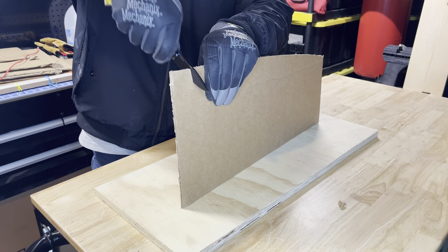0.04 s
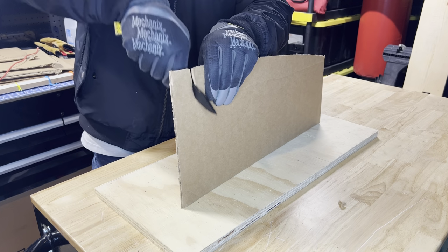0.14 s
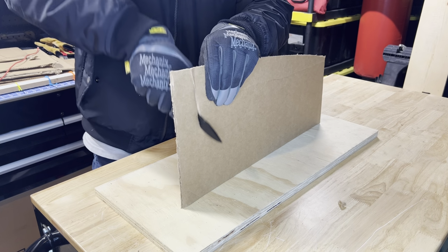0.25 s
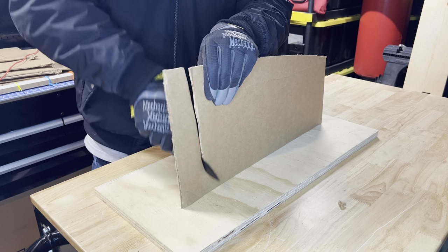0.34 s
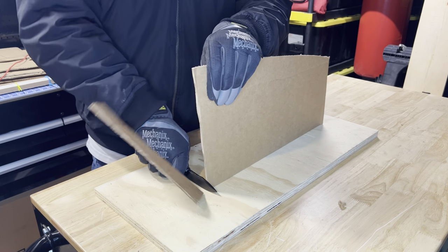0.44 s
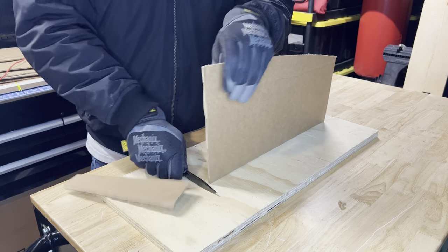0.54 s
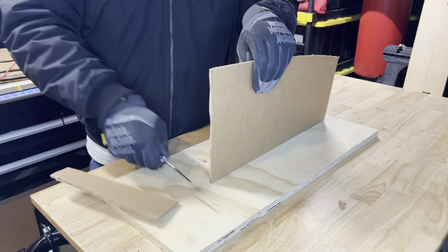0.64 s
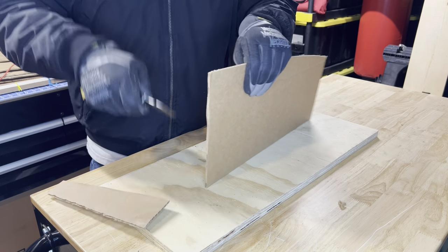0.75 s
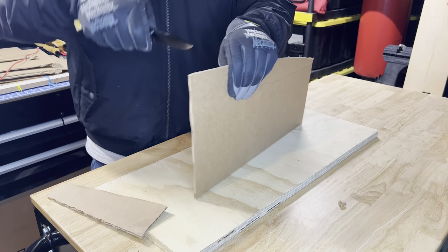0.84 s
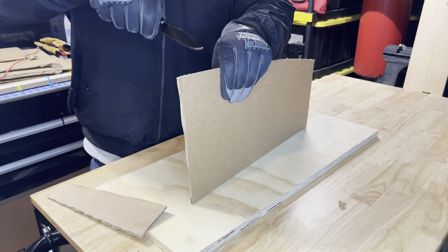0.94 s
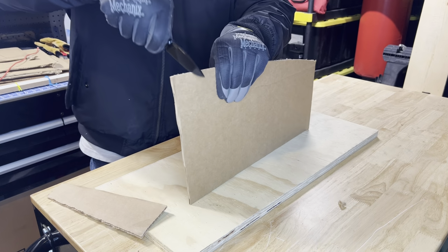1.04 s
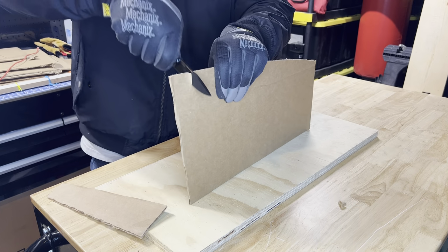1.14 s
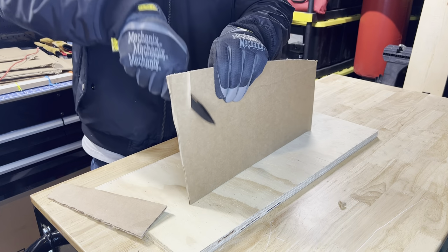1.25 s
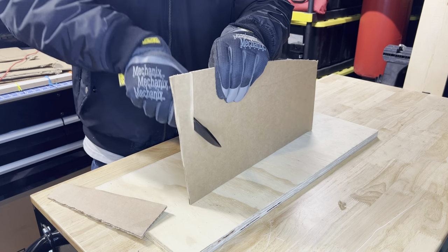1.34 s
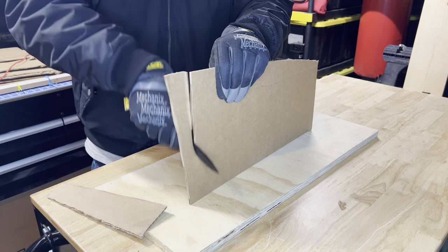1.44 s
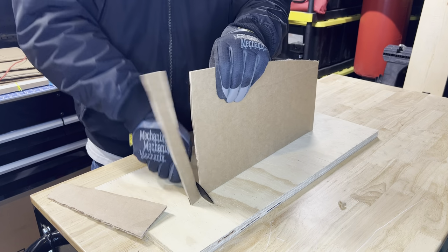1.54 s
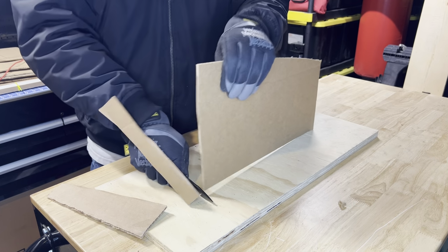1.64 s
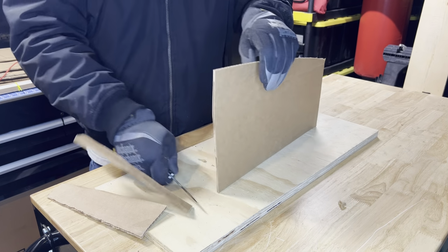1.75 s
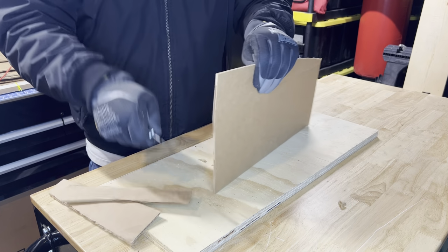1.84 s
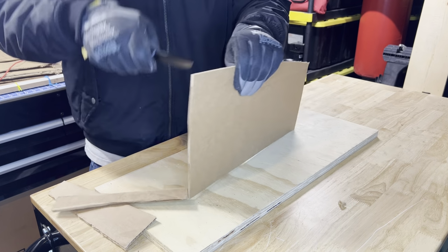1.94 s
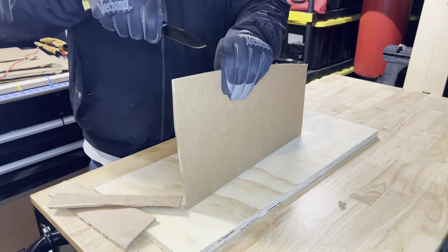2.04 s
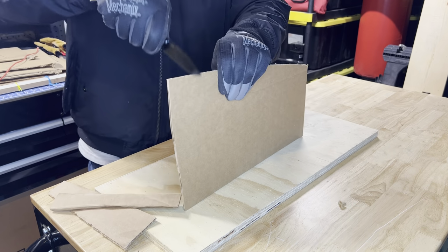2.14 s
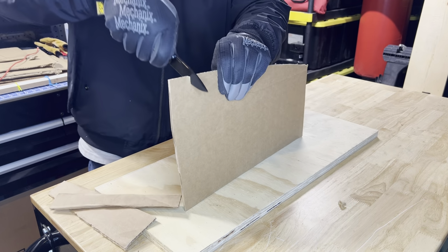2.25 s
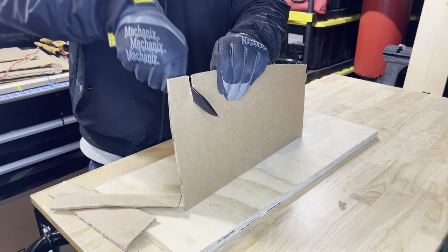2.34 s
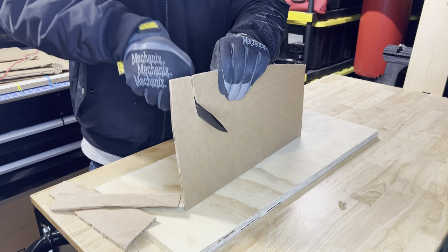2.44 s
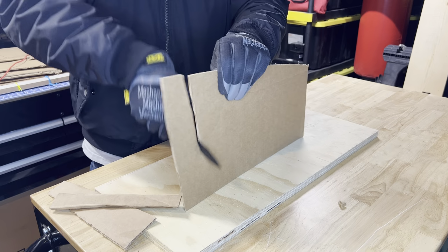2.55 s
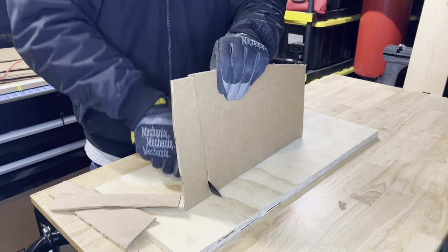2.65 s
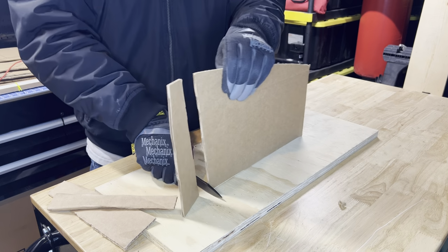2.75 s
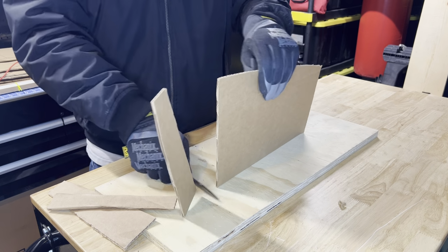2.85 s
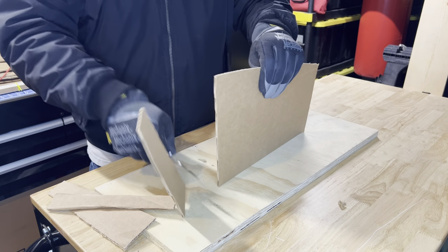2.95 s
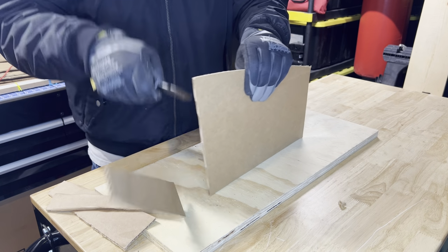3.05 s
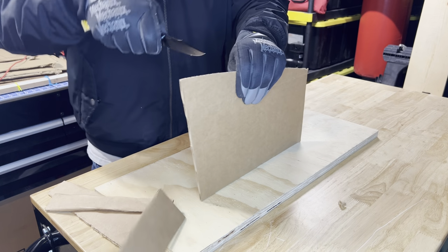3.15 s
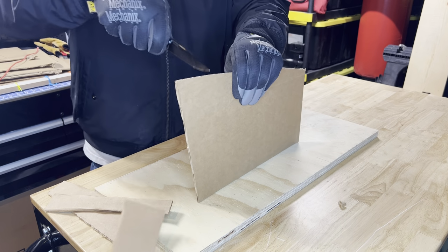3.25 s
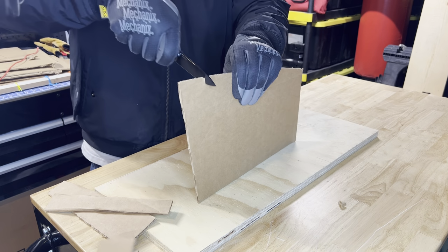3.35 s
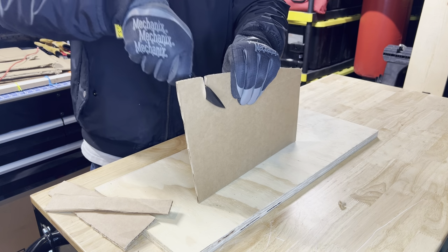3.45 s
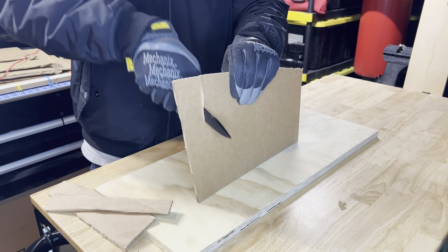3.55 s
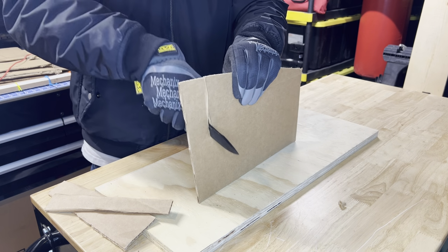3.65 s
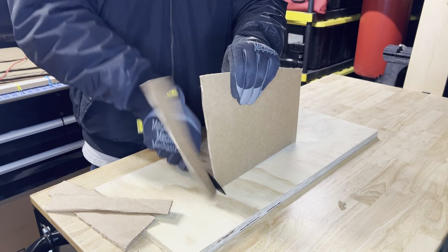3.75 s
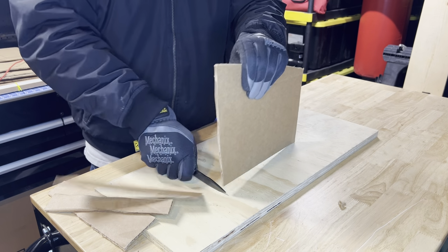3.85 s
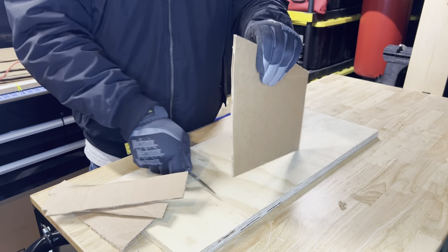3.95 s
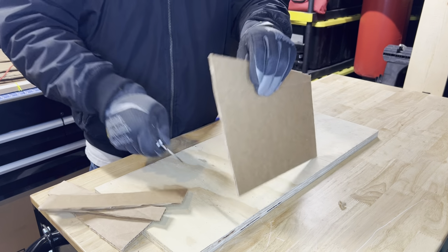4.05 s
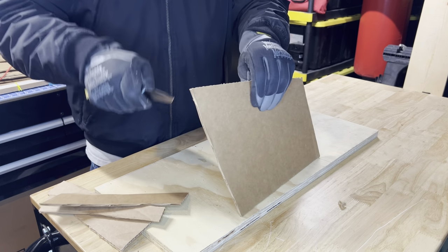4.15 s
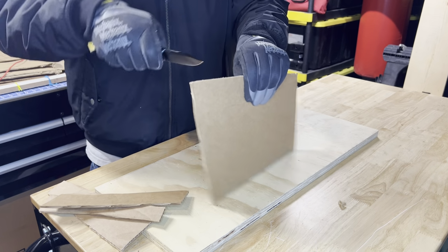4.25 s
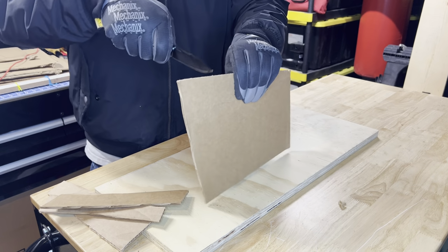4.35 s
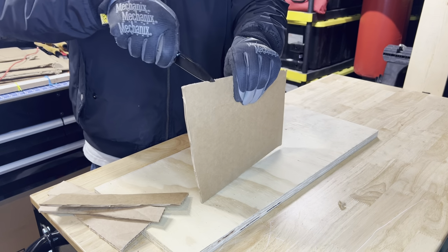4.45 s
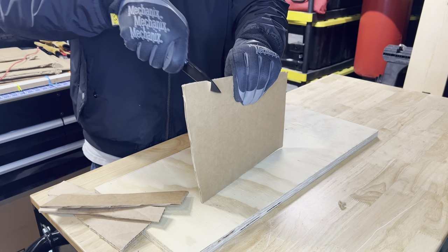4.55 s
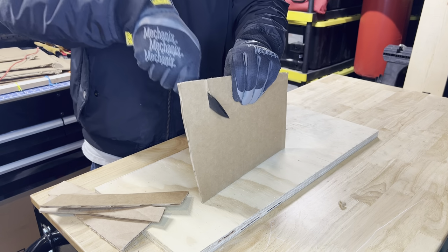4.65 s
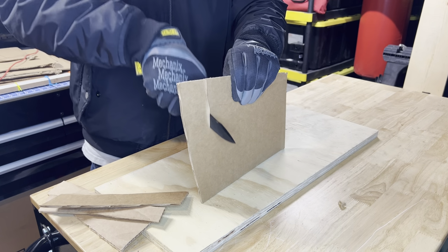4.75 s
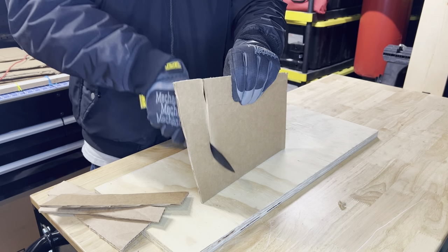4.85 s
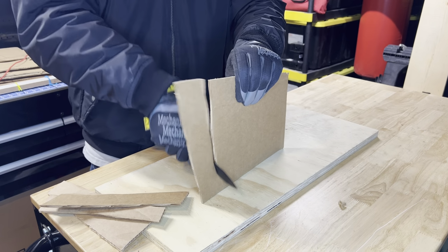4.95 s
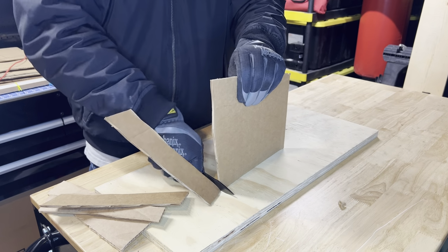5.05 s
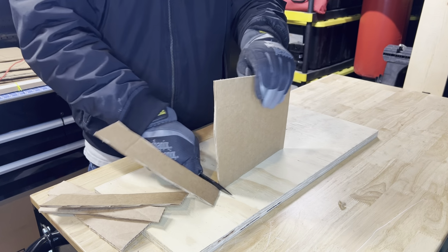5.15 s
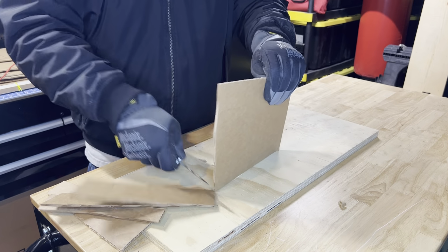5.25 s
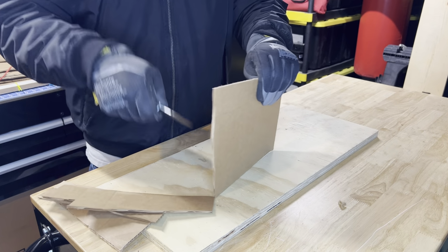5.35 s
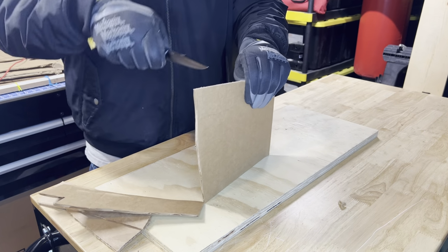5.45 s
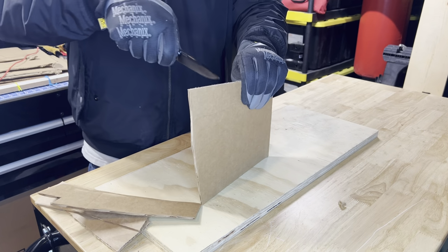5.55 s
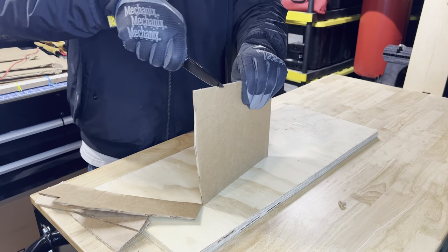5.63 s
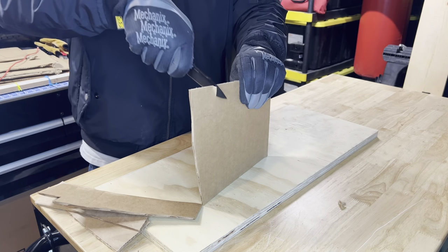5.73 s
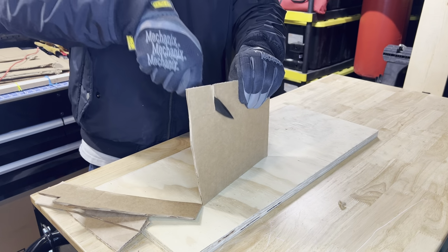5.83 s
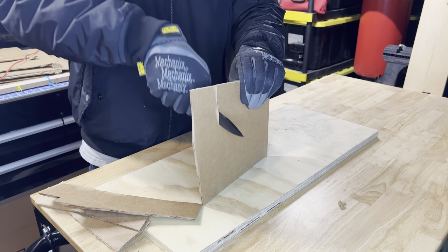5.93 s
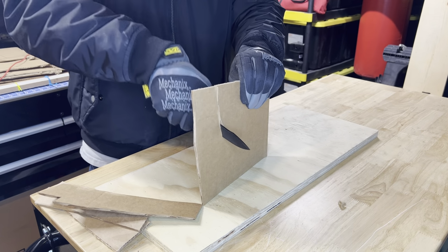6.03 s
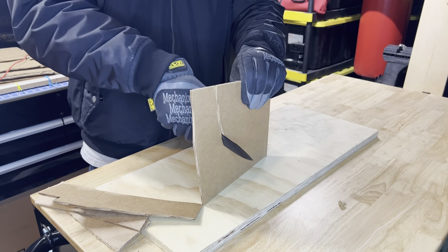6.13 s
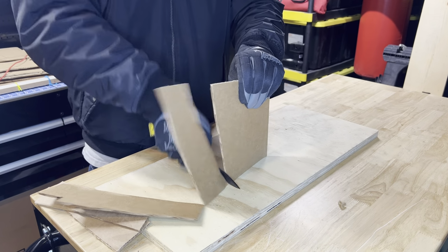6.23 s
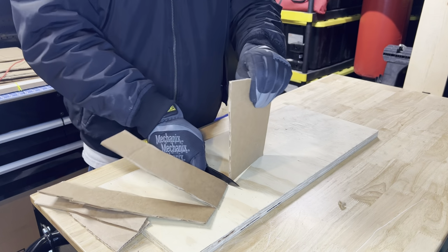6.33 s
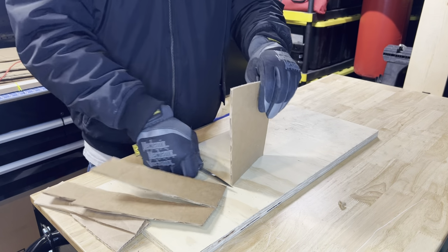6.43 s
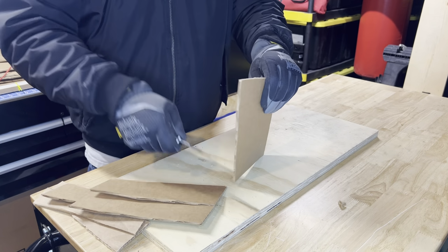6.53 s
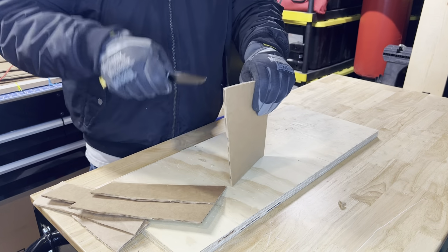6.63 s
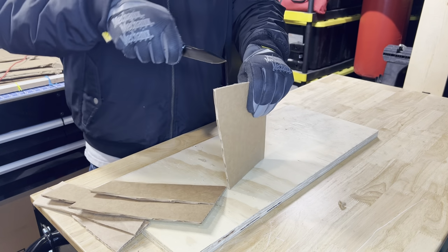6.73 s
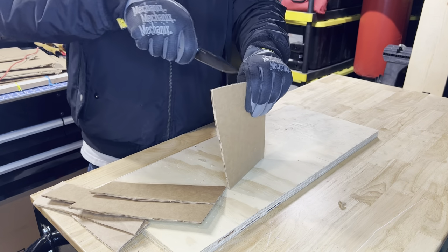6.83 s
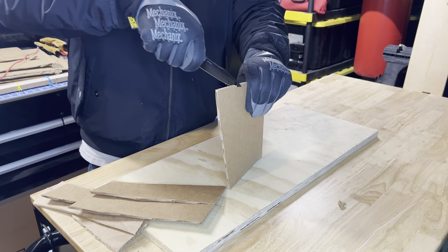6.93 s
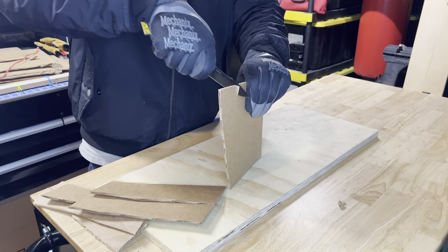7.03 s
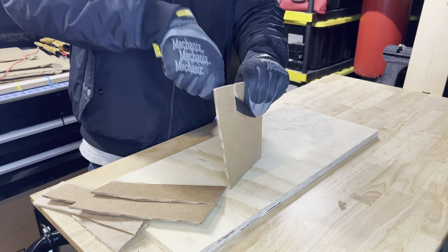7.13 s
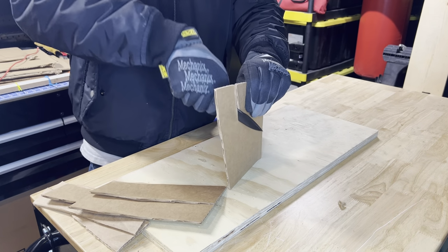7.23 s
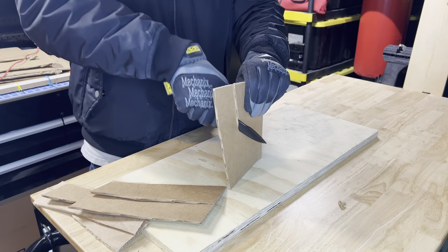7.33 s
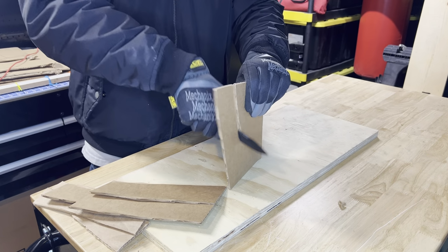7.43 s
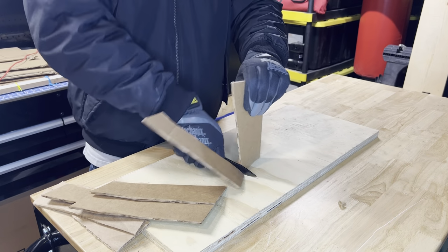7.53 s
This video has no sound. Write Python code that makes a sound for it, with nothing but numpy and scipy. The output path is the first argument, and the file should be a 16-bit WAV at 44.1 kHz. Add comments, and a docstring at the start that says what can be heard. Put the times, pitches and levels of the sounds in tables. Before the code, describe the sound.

Close, crisp cardboard slicing: seven fibrous ripping strokes with end knocks, hollow strip drops, sleeve rustle and sheet bumps on a wooden bench.

```python
"""Cutting cardboard in a small garage

A folding knife slices seven strips off a corrugated sheet held upright on a wooden bench, near a stereo pair.
Most strokes open with a tap on the top edge; all rasp down through snapping fibres and end in a knock.
Cut strips drop and ring; between strokes a sleeve rustles and the sheet is bumped or dragged over the wood.
Clicks and noise make the rasp and rustle, dying modes the rings; the garage adds echoes and a short tail."""
import sys
import numpy as np
from scipy import signal
from scipy.fft import rfft, irfft
from scipy.io import wavfile

SR = 44100
rng = np.random.default_rng(int(sys.argv[2]) if len(sys.argv) > 2 else 0)


def generate_wav(signal):
    """Clip the signal to [-1, 1] and save it as 16-bit WAV at the path in sys.argv[1]."""
    frames = np.transpose(np.atleast_2d(signal))
    scaled = np.clip(frames, -1, 1) * 32767
    pcm = np.round(scaled).astype(np.int16)
    wavfile.write(sys.argv[1], SR, pcm)


N = 334391
TIME = np.arange(N) / SR  # [s], one value per sample
CLOCK = np.arange(0, N / SR + .001, .001)  # [s], coarser steps for slow gestures

# Levels in the tables are relative: each layer also has a gain of its own.
# the blade's steady travel down the sheet: (start [s], end [s], rasp of the fibres [dB],
#   drone of the flutes [dB], shudder of the sheet [dB], hollow note [Hz] before drift and fall)
STROKES = [(-.02, 0.41, -37.5, -43, -41.5, 1430), (1.053, 1.584, -39.5, -41.5, -38.5, 1526),
           (2.169, 2.7, -45.5, -42.5, -40.5, 1510), (3.337, 3.746, -40, -40.5, -36.5, 1458),
           (4.488, 5.016, -41.5, -50, -43, 1539), (5.615, 6.284, -43.5, -43, -40.5, 1595),
           (6.908, 7.537, -43.5, -53, -47.5, 1790)]
# the hand pushes harder and the blade surges ahead:
#   (peak [s], rise [s], fall [s], rasp [dB], drone [dB], shudder [dB])
SURGES = [(.165, 0.072, 0.094, -35, -40, -54), (0.306, 0.066, 0.068, -29.5, -56, -33),
          (0.382, 0.044, 0.011, -28.5, -31.5, -49), (1.29, 0.14, 0.033, -36.5, -34, -38),
          (1.438, 0.04, 0.021, -31.5, -36, -36), (1.532, 0.078, 0.011, -28, -54, -33),
          (2.309, 0.095, 0.2, -36.5, -37.5, -51), (2.566, 0.062, 0.071, -26.5, -27.5, -32),
          (3.363, 0.061, 0.075, -37, -55, -50), (3.55, 0.13, 0.028, -39.5, -31.5, -52),
          (3.711, 0.042, 0.039, -27.5, -33.5, -30), (3.753, 0.036, 0.0084, -25.5, -46, -34),
          (4.54, 0.065, 0.22, -35, -62, -51), (4.72, 0.12, 0.05, -58, -34.5, -50),
          (4.857, 0.11, 0.024, -32, -33.5, -33.5), (4.978, 0.042, 0.023, -26.5, -52, -35),
          (5.721, 0.035, 0.036, -31.5, -36, -46.5), (5.845, 0.087, 0.05, -36.5, -36, -52),
          (5.984, 0.057, 0.0099, -36.5, -37, -30), (6.231, 0.061, 0.027, -25, -27.5, -27),
          (7.012, 0.043, 0.05, -34.5, -56, -42), (7.09, 0.072, 0.048, -37, -41.5, -40),
          (7.24, 0.075, 0.054, -41, -38.5, -38), (7.352, 0.056, 0.086, -45.5, -39, -32.5),
          (7.498, 0.051, 0.0064, -23.5, -29, -30.5)]
ENTRY_S, RELEASE_S = 0.0089, 0.034  # the edge sinks in; the rasp dies away once it is out
# arm movements between strokes:
#   (peak [s], half length [s], swish of the sleeve [dB], rumble of the handled sheet [dB])
ARM_MOVES = [(0.463, 0.058, -39.5, -47), (0.576, 0.068, -50.5, -43), (0.724, 0.011, -38.5, -45),
             (.82, 0.14, -46, -45.5), (0.904, 0.033, -44, -56), (1.608, 0.11, -43.5, -47),
             (1.795, 0.073, -49.5, -39), (1.986, 0.12, -47, -47), (2.086, 0.015, -44.5, -41),
             (2.735, 0.063, -39, -39), (2.898, 0.039, -44, -58), (2.988, 0.032, -40, -43.5),
             (3.065, 0.045, -37.5, -61), (3.199, 0.035, -43, -38), (3.856, 0.12, -42, -37),
             (3.965, 0.046, -46, -46), (4.123, 0.053, -51, -32.5), (4.287, 0.036, -59, -41),
             (4.422, .03, -62, -39.5), (5.05, 0.055, -44.5, -42.5), (5.202, 0.039, -44.5, -53),
             (5.214, 0.0045, -38.5, -58), (5.336, 0.067, -44.5, -49), (5.447, 0.04, -41.5, -52),
             (6.309, 0.073, -45, -46.5), (6.422, 0.041, -50, -53), (6.676, 0.035, -46, -46.5)]
FIDGET_DB, FIDGET_RUMBLE_DB = -55, -54.5  # the jacket and the held sheet stir faintly throughout
# the faint stirring of hands and sheet dips around the start of a stroke:
#   (time [s], half length [s], dip [dB])
STIRRING_DIPS = [(1.025, .05, -1.5), (2.148, 0.032, -8), (3.26, .03, -1), (5.57, 0.041, -6),
                 (6.958, 0.4, -17)]
# the blade meets the top edge, catches on a flute or breaks out at the bottom:
#   (time [s], knock [dB], thump [dB], crisp tick [dB], hollow ring [dB], hardness [dB per octave])
CONTACTS = [(.401, -6, -27, -26, -46, -1), (1.061, -31, -40, -44, -35, -2),
            (1.283, -21, -43, -55, -24, 2.5), (1.55, -9.5, -32, -30.5, -45, -2.5),
            (2.17, -29.5, -29.5, -41.5, -38, 1), (2.697, -6.5, -28.5, -22, -44, 0.5),
            (3.283, -22.5, -31, -41.5, -33, -2.5), (3.317, -19.5, -31, -33.5, -30, -0.5),
            (3.758, -13.5, -30.5, -30.5, -43, -6.5), (4.38, -44, -39, -44.5, -53, 4),
            (4.893, -17, -28, -32.5, -27, 5), (4.991, -14.5, -31.5, -30, -31, -4),
            (5.589, -28.5, -36.5, -44, -37, -5.5), (6.069, -20.5, -39, -33, -34, -1),
            (6.244, -8, -31.5, -27.5, -31, -5), (6.8935, -38.5, -41.5, -46, -60, 2.5),
            (6.919, -42, -64, -42, -57, 6), (7.507, -9.5, -25.5, -24.5, -22.5, -4.5)]
# cut strips and the sheet's foot land on the wood: (time [s], knock [dB], crisp tick [dB],
#   hollow ring [dB], hardness [dB per octave], ring of a loose strip [dB], its note [Hz])
LANDINGS = [(.548, -20, -37.5, -32, -12.5, -53, 1500), (.567, -24.5, -45, -53, 11.5, -47, 1500),
            (1.7174, -6.5, -50, -36, 0, -11, 1580), (1.7285, -28, -61, -38, 4, -37, 1620),
            (1.765, -13, -57, -46, -4, -39, 1620), (1.834, -22, -37, -45, 9.5, -45, 1600),
            (2.8119, -17, -64, -52, -2, -19.5, 1570), (2.8471, -19, -46, -51, -4, -43, 1590),
            (3.828, -27, -42, -27, -6, -50, 1400), (3.881, -22.5, -36.5, -35, -4, -50, 1400),
            (4.1084, -1.5, -41, -22.5, 1, -22.5, 1860), (4.437, -29.5, -45, -26, 0, -31, 1646),
            (5.289, -23, -44.5, -39, -0.5, -34.5, 1460), (5.311, -22.5, -58, -44, -6.5, -41, 1450),
            (6.434, -22.5, -56, -35, -1.5, -34, 1410), (6.499, -35.5, -46, -39, 7.5, -52, 1420),
            (6.627, -29.5, -56, -41, -3, -50, 1400), (6.663, -38, -58, -44, -6, -60, 1400)]
LANDING_THUMP_DB, THUMP_GROWTH = -27, 0.61  # thump under a 0 dB landing, and dB of thump per dB of knock
# the sheet nudged softly against the bench:
#   (time [s], thump [dB], knock relative to it [dB], hardness [dB per octave])
BUMPS = [(0.67, -48.5, 8, 11), (0.731, -36, 0, 0.5), (.799, -37, 1, 5), (.885, -32.5, -12.5, 2),
         (0.913, -42.5, 1, 2), (1.393, -32.5, 5, 6), (1.928, -44, 1, 2), (2.057, -41.5, -3, 2),
         (2.547, -36, 13, -10), (2.989, -44, 3, -2), (3.087, -34.5, 4.5, -3), (3.151, -35, 1, -7),
         (3.174, -45.5, 14.5, 0), (3.969, -39, 8, -6), (3.997, -37, 11, -5), (4.238, -43.5, 22, -6),
         (5.237, -47, -5, -1), (6.004, -39.5, 1, -6), (6.448, -36.5, 6, 1)]
BUMP_TICK_DB, BUMP_RING_DB = -18.5, -13.5  # relative to the thump
# the hand or the sheet's foot leans on the bench with a deep thud: (time [s], level [dB])
THUDS = [(.68, -41), (0.91, -38.5), (2.855, -40), (5.233, -43.5), (5.994, -44), (6.318, -39)]
THUD_RISE_S, CRACK_RISE_S = 0.0091, 0.00095  # in a crack the fibres give way one after another
# sleeve slides and a binding blade hiss in wide bands; once, at 2.86 s, the blade squeaks faintly
#   in a narrow one: (peak [s], half length [s], level [dB], centre [Hz], width [Hz])
RUBS = [(1.986, 0.043, -52.5, 4240, 1400), (2.862, 0.016, -49, 3650, 300), (5.824, 0.08, -43, 2920, 2410),
        (7.073, 0.081, -42, 3000, 2400)]
# the sheet's edge juddering over the wood, one table a drag:
#   (time [s], level [dB], slips [per s] before random wavering)
DRAGS = [
    [(3.84, -32.5, 80), (3.86, -36.5, 72), (3.885, -42.5, 72)],
    [(3.935, -35.5, 61), (3.97, -35, 64), (4.02, -43.5, 69), (4.08, -52.5, 52)],
    [(4.385, -57, 67), (4.42, -69, 75), (4.45, -35.5, 63), (4.49, -61, 58)],
]
# the sheet's edge or the blade snags on the wood with one hollow, pitched scuff:
#   (time [s], level [dB], pitch [Hz])
SNAGS = [(3.83, -18, 800), (3.85, -24, 780), (3.955, -28.5, 840), (3.882, -38, 760), (3.939, -27, 1250),
         (3.981, -24, 788), (4.043, -18, 320), (4.058, -33, 803), (4.238, -27, 1015), (4.38, -33, 1540),
         (4.406, -21, 315), (4.438, -29, 755), (6.747, -42.5, 562)]
SNAG_CYCLES, SNAG_RISE_S = 22, 0.0014  # cycles until it is 60 dB down
# the dragged edge catches into a hollow groan, one table a groan:
#   (time [s], level [dB], pitch [Hz] before jitter)
GROANS = [
    [(3.842, -36, 440), (3.87, -41, 431)],
    [(3.93, -36.5, 424), (3.958, -33, 415.5), (3.98, -47.5, 426), (4.002, -37, 429), (4.03, -48, 417)],
]
# overtones of the groan: (multiple of the pitch, level [dB])
GROAN_PARTIALS = [(1, 0), (2, -6), (3, -12), (4, -22)]
GROAN_JITTER = .05  # share by which the pitch wavers
# the blade wiped quickly over the wood: (time [s], level [dB])
SCRAPE = [(4.208, -43.5), (4.224, -28.5), (4.238, -25), (4.25, -50), (4.258, -58)]

# colour of the snapping fibres: (frequency [Hz], level [dB])
RASP_COLOUR = [(150, -30), (400, -12), (700, -6), (1000, -6.5), (2000, -6.5), (2800, -7), (4100, -8),
               (5200, -0.5), (6300, 0.3), (7300, -2), (8400, -0.5), (9300, -2), (10700, -3), (11900, -10),
               (15500, -9.5), (16000, -14)]
# colour of the hollow flutes: (frequency [Hz], level [dB])
FLUTE_COLOUR = [(200, -28), (500, -2.5), (720, -10), (1030, 9), (1200, -0.5), (1700, 0), (2100, -0.5),
                (2600, -2.5), (3400, -3), (6000, -27.5)]
# colour of the shaken or handled sheet: (frequency [Hz], level [dB])
SHUDDER_COLOUR = [(20, -51), (40, -13.5), (60, 1.5), (82, -5), (110, 0), (155, -1.5), (195, -0.5),
                  (280, -2), (400, -6.5), (650, -13.5), (1200, -25.5), (3000, -39.5)]
# colour of cloth on cloth: (frequency [Hz], level [dB])
SLEEVE_COLOUR = [(100, -17), (500, -1), (1200, 2.5), (2200, 0.5), (3200, -1.5), (4500, 2.5), (6300, 9),
                 (7400, 3.5), (8700, 3), (10700, -2), (12000, -5.5), (16000, -7)]
# colour of faint room air: (frequency [Hz], level [dB])
AIR_COLOUR = [(20, -7), (60, 19), (200, -23), (500, -43), (1200, -6), (3000, -15), (8000, -57),
              (16000, -34)]
# colour of a knock before its hardness tilt: (frequency [Hz], level [dB])
KNOCK_COLOUR = [(20, -70), (60, -28.5), (250, 8), (500, 3.5), (900, 6), (1300, 2.5), (1650, -7), (2200, -8),
                (2900, -16), (6000, -19.5), (16000, -60.5)]
# colour of the thump under a blow: (frequency [Hz], level [dB])
THUMP_COLOUR = [(20, -60.5), (50, -18), (110, 2.5), (155, -1.5), (210, 8), (400, -2), (650, -9),
                (1200, -33.5), (4000, -56.5)]
# colour of crushed fibres: (frequency [Hz], level [dB])
TICK_COLOUR = [(300, -25), (1500, -5), (3000, -1), (6000, 0), (10700, -3), (12000, -9), (16000, -10)]
# colour of the juddering edge: (frequency [Hz], level [dB])
JUDDER_COLOUR = [(20, -65), (50, -55), (200, 0.5), (420, 5.5), (600, -10), (830, -10), (1050, -19.5),
                 (1280, -9), (1700, -14), (3000, -15.5), (10000, -48)]
# colour of the blade on the wood: (frequency [Hz], level [dB])
STEEL_COLOUR = [(100, -7), (400, -1), (1100, 0), (1900, -1), (3000, -8), (4500, -5), (6200, 3), (7300, 1),
                (8400, 3), (9500, -5), (11000, -2), (12000, -10), (16000, -13)]

# ring of the hollow board after a knock, before detuning: (frequency [Hz], level [dB], decay by 60 dB [s])
BOARD_MODES = [(678, 7, 0.09), (834, -1, 0.08), (1030, 1, 0.05), (1290, -4, 0.055), (1830, -3, 0.05)]
# brief ring of a landed strip, tied to its note: (multiple of the note, level [dB], decay by 60 dB [s])
STRIP_MODES = [(.24, 0, .04), (.66, 1, .045), (.93, 3, .03), (1, 10, .032), (1.27, -9, .04),
               (1.42, -7, .035)]
STRIP_LAG_S = 0.00166  # the strip rings once the blow has run along it
# slower modes of the heavy bench top, before detuning: (frequency [Hz], level [dB], decay by 60 dB [s])
BENCH_MODES = [(61, -6, 0.17), (80.6, 0, 0.23), (116, -6, 0.11)]

# the flutes' hollow note
NOTE_DRIFT = 0.063  # wavers by this share
NOTE_FALL_PER_S = 0.12  # sinks by this share a second as the blade moves down
NOTE_FADE_DB_PER_S = 19  # strongest halfway down the sheet
NOTE_CHOKE_DB = -28.5  # a rasp louder than this tears the flutes open and chokes the note
NOTE_FLUTTER_DB, NOTE_WIDTH_HZ = 1.5, 420  # the note comes and goes from flute to flute
# the rasp bounces off the bench, sooner as the blade comes down
BOUNCE_TOP_S, BOUNCE_BOTTOM_S, BOUNCE_SHARE = 0.000701, .0002, 0.1

# decay of the garage: (frequency [Hz], decay by 60 dB [s])
GARAGE_DECAY = [(100, 0.25), (400, 0.19), (1000, 0.21), (3000, 0.23), (7000, 0.2), (16000, 0.12)]
# left-right likeness of the garage's tail: (frequency [Hz], likeness [share])
GARAGE_LIKENESS = [(50, 0.91), (150, 0.95), (300, 0.92), (600, 0), (1200, 0), (3000, 0.078), (16000, 0)]
# early reflections from bench and body, before the random distance:
#   (delay left [s], delay right [s], gain [amplitude])
ECHOES = [(.0019, 0.0017, 0.76), (.0047, 0.0068, 0.1), (.0086, 0.021, 0.21)]
# the closely spaced microphones: in the top treble, their sum and their difference fade in turn
PAIR_IN_STEP_HZ, PAIR_PERIOD_HZ, PAIR_FROM_HZ, PAIR_FULL_HZ = 12020, 3600, 8400, 9900
# balance of the microphones: (frequency [Hz], left minus right [dB])
LEFT_LEAN = [(100, -1.0), (350, -1.8), (1000, 2.5), (1700, -0.5), (3200, 1.0), (4900, 4.0), (6300, 3.0),
             (7800, -2.0), (9500, 0.5), (16000, -1)]
BAND_LIMIT_HZ = 16100


def gain_of(db):
    """Decibels to amplitude."""
    return 10 ** (np.asarray(db) / 20)


def unit(x):
    """Scales to an energy of one."""
    return x / np.sqrt(np.sum(x ** 2) + 1e-20)


def read(points, hz):
    """Reads a table on a log-frequency axis."""
    table_hz, value = np.transpose(points)
    return np.interp(np.log(hz + 1), np.log(table_hz + 1), value)


def add(mix, s, sound):
    """Mixes a sound in at a time."""
    part = mix[max(round(s * SR), 0):][:len(sound)]
    part += sound[:len(part)]


def response(points, spread=0, tilt_db=0, size=8192):
    """Causal impulse response of a colour; bending waves bring 1 kHz `spread` s late and the bass later."""
    hz = np.fft.fftfreq(size, 1 / SR)
    octaves = np.log2(np.clip(abs(hz), 400, 4000))
    log_gain = np.log(gain_of(read(points, abs(hz)) + tilt_db * octaves))
    bending = 4 * np.pi * spread * np.sign(hz) * np.sqrt(1000 * abs(hz))
    phase = -signal.hilbert(log_gain).imag - bending  # minimum phase, then the bending delay
    return unit(np.fft.ifft(np.exp(log_gain + 1j * phase)).real[:size // 2])


def coloured(x, points, spread=0):
    """Passes a signal through a colour."""
    return signal.oaconvolve(x, response(points, spread))[:len(x)]


def level(tables, column, fade=0.034):
    """Amplitude along a column of dB curves, fading over `fade` s just outside each table."""
    times, gains = [], []
    for rows in tables:
        times += [rows[0][0] - fade, *(row[0] for row in rows), rows[-1][0] + fade]
        gains += [0, *gain_of([row[column] for row in rows]), 0]
    return np.interp(TIME, times, gains)


def wander(per_s):
    """Random drift of about unit size, with `per_s` random values drawn a second."""
    return np.interp(TIME * per_s, np.arange(N), rng.standard_normal(N))


def snaps(per_s, scatter_db):
    """Random tiny clicks of uneven size, with a mean power of one."""
    signs = rng.choice([-1, 1], N)
    sizes = gain_of(scatter_db * np.minimum(rng.exponential(1, N), 5)) * signs
    happens = rng.random(N) < per_s / SR
    return unit(sizes * happens) * np.sqrt(N)


def resonate(x, hz, width):
    """A resonance that follows the curve hz: shifts it to zero, smooths twice, and shifts back."""
    turn = np.exp(2j * np.pi * np.cumsum(hz) / SR)
    r = np.exp(-np.pi * width / SR)
    smooth = signal.lfilter([(1 - r) ** 2], [1, -2 * r, r * r], x / turn)
    return unit((turn * smooth).real) * np.sqrt(N)


def swell(peak_s, rise_s, fall_s):
    """A smooth rise to one and a smooth fall."""
    return np.exp(-((CLOCK - peak_s) / np.where(CLOCK < peak_s, rise_s, fall_s)) ** 2)


def together(shapes, levels_db):
    """Amplitude of overlapping gestures, one curve for each column of levels; their powers add."""
    powers = gain_of(levels_db).T ** 2 @ np.square(shapes)
    return [np.interp(TIME, CLOCK, np.sqrt(power)) for power in powers]


def ringing(modes, size, spread=0.0017):
    """Dying modes with an energy of one, slightly detuned: no two pieces are the same size."""
    t = np.arange(size) / SR
    detune = 1 + spread * rng.standard_normal()
    return unit(sum(gain_of(db - 60 * t / t60) * np.sin(2 * np.pi * hz * detune * t)
                    for hz, db, t60 in modes))


def burst(t60, size=4096):
    """A quickly rising, dying puff of noise with an energy of one."""
    t = np.arange(size) / SR
    return unit(rng.standard_normal(size) * np.minimum(t / CRACK_RISE_S, 1) * 1000 ** (-t / t60))


def travel(start, end):
    """The edge sinks in, holds its pace and leaves the sheet."""
    entry = np.clip((CLOCK - start) / ENTRY_S, 0, 1)
    return entry * np.exp(-np.maximum(CLOCK - end, 0) / RELEASE_S)


def bounced(x):
    """Adds the reflection off the bench, whose delay shrinks during each stroke and sweeps the colour."""
    times = [s for row in STROKES for s in row[:2]]
    delay = np.interp(TIME, times, [BOUNCE_TOP_S, BOUNCE_BOTTOM_S] * len(STROKES))
    reflection = np.interp(TIME - delay, TIME, x)
    return (x + BOUNCE_SHARE * reflection) / np.hypot(1, BOUNCE_SHARE)


def flute_note(fibres, rasp):
    """Snapping fibres ring the hollow flutes on a sinking note, choked where the rasp is loud."""
    strokes = np.array(STROKES)
    middles = strokes[:, :2].mean(1)
    nearest = abs(TIME[:, None] - middles).argmin(1)
    past_middle = TIME - middles[nearest]
    note_hz = strokes[nearest, 5] * np.exp(NOTE_DRIFT * wander(per_s=16) - NOTE_FALL_PER_S * past_middle)
    flutter_db = NOTE_FLUTTER_DB * wander(per_s=54)
    strength = gain_of(-9.5 + flutter_db - NOTE_FADE_DB_PER_S * abs(past_middle))
    choke = 1 + (rasp / gain_of(NOTE_CHOKE_DB)) ** 2
    return resonate(fibres, note_hz, NOTE_WIDTH_HZ) * strength / choke


def cutting():
    """Fibres snap under the edge in small clumps; they hiss, ring the hollow flutes and shake the sheet."""
    shapes = [travel(*row[:2]) for row in STROKES] + [swell(*row[:3]) for row in SURGES]
    levels_db = [row[2:5] for row in STROKES] + [row[3:] for row in SURGES]
    rasp, drone, shudder = together(shapes, levels_db)
    grip = gain_of(1.4 * wander(per_s=260) + .9 * wander(per_s=60))
    fibres = snaps(per_s=5500, scatter_db=3.0) * grip
    tears = snaps(per_s=1400, scatter_db=3.5) * grip
    hiss = bounced(coloured(fibres, RASP_COLOUR)) * rasp * gain_of(-0.5)
    hollow = coloured(tears, FLUTE_COLOUR) * gain_of(-7.5) + flute_note(fibres, rasp)
    shaking = coloured(tears, SHUDDER_COLOUR, spread=0.002016) * shudder * gain_of(-8.0)
    return hiss + hollow * drone + shaking


def handling():
    """The sleeve brushes the jacket in dense grains; the gloved hand shifts the sheet in sparser, lower ones."""
    fidget = gain_of(sum(db * swell(s, half, half) for s, half, db in STIRRING_DIPS))
    shapes = [swell(s, half, half) for s, half, _, _ in ARM_MOVES] + [fidget]
    levels_db = [row[2:] for row in ARM_MOVES] + [(FIDGET_DB, FIDGET_RUMBLE_DB)]
    sleeve, sheet = together(shapes, levels_db)
    swish = coloured(snaps(per_s=8700, scatter_db=5.0), SLEEVE_COLOUR) * sleeve * gain_of(-4.0)
    rumble = coloured(snaps(per_s=640, scatter_db=2.0), SHUDDER_COLOUR) * sheet * gain_of(-7.5)
    return swish + rumble


def room_air():
    """Faint, steady coloured noise under everything."""
    return coloured(rng.standard_normal(N), AIR_COLOUR) * gain_of(-65.0)


def impacts():
    """Every impact as (s, knock dB, thump dB, tick dB, ring dB, hardness dB per octave)."""
    # a landing's thump grows more slowly than its knock
    landings = [(s, db, LANDING_THUMP_DB + THUMP_GROWTH * db, *rest) for s, db, *rest, _, _ in LANDINGS]
    bumps = [(s, db + knock_db, db, db + BUMP_TICK_DB, db + BUMP_RING_DB, hardness)
             for s, db, knock_db, hardness in BUMPS]
    return CONTACTS + landings + bumps


def blows(size=4096):
    """A blow sends a bending wave through the board, treble first, and rings its flutes."""
    out = np.zeros(N)
    spread, lead_s = .0013, .0003
    thump = response(THUMP_COLOUR, spread) * gain_of(28.5)
    for s, knock_db, thump_db, _, ring_db, hardness in impacts():
        knock = gain_of(knock_db + 14.5) * response(KNOCK_COLOUR, spread, hardness)
        add(out, s - lead_s, knock + gain_of(thump_db) * thump)
        add(out, s, gain_of(ring_db + 15.0) * ringing(BOARD_MODES, size))
    return out


def ticks():
    """At each impact a few fibres are crushed at once, with a short crisp crack."""
    out = np.zeros(N)
    for s, _, _, tick_db, _, _ in impacts():
        add(out, s, gain_of(tick_db) * burst(t60=0.0075))
    return coloured(out, TICK_COLOUR) * gain_of(27.5)


def strips(size=4096):
    """A loose strip lands and rings for a moment on its own note."""
    out = np.zeros(N)
    for s, *_, strip_db, note_hz in LANDINGS:
        modes = [(multiple * note_hz, db, t60) for multiple, db, t60 in STRIP_MODES]
        add(out, s + STRIP_LAG_S, gain_of(strip_db + 19) * ringing(modes, size))
    return out


def thuds(size=12000):
    """A soft push sets the bench top swaying."""
    out = np.zeros(N)
    rise = np.minimum(TIME[:size] / THUD_RISE_S, 1)
    for s, db in THUDS:
        add(out, s, gain_of(db + 33.0) * rise * ringing(BENCH_MODES, size, spread=0.061))
    return out


def rubs():
    """Sliding faces excite a band of dense grains: wide for a hiss, narrow for the one faint blade squeak."""
    grains = snaps(per_s=9700, scatter_db=3)
    out = np.zeros(N)
    for s, half, db, hz, width in RUBS:
        band = resonate(grains, np.full(N, hz), width)
        out += band * gain_of(db) * np.interp(TIME, CLOCK, swell(s, half, half))
    return out


def dragging():
    """The sheet's lower edge sticks and slips on the wood; each slip is a short, dull scuff."""
    s, _, per_s = np.concatenate(DRAGS).T
    rate = np.interp(TIME, s, per_s) * np.exp(0.24 * wander(per_s=40))
    slip_phase = (np.cumsum(rate) / SR) % 1  # share of the way to the next slip
    scuffs = rng.standard_normal(N) * np.exp(-slip_phase / 0.9)
    return coloured(scuffs * level(DRAGS, 1), JUDDER_COLOUR, spread=0.002253) * gain_of(2.5)


def snagging(size=4096):
    """A snag lets go and the bent edge flaps for a few cycles."""
    out, t = np.zeros(N), TIME[:size]
    for s, db, hz in SNAGS:
        decay = gain_of(-60 * hz * t / SNAG_CYCLES)
        flap = np.sin(2 * np.pi * hz * t) * decay * np.minimum(t / SNAG_RISE_S, 1)
        add(out, s, gain_of(db + 11.5) * unit(flap))
    return out


def groaning():
    """Where the dragged edge slips fast and evenly it sounds a rough, hollow note."""
    s, _, hz = np.concatenate(GROANS).T
    pitch_hz = np.interp(TIME, s, hz) * np.exp(GROAN_JITTER * wander(per_s=340))
    turns = np.cumsum(pitch_hz) / SR
    note = sum(gain_of(db) * np.sin(2 * np.pi * k * turns) for k, db in GROAN_PARTIALS)
    return note * level(GROANS, 1, fade=.006) * gain_of(2.5 * wander(per_s=150))


def scraping():
    """The blade once skims the wood in a quick wipe of dense clicks with a steely colour."""
    grains = snaps(per_s=4000, scatter_db=-1.5)
    return coloured(grains, STEEL_COLOUR) * level([SCRAPE], 1) * gain_of(-1.5)


def garage(x, wet_db, build_s=0.00046, size=8192):
    """Direct sound, a little earlier on the left, then early reflections and a short diffuse tail."""
    t = np.arange(size) / SR
    hz, when, (a, b) = signal.stft(rng.standard_normal((2, size)), SR, nperseg=256)
    same = np.clip(read(GARAGE_LIKENESS, hz), -1, 1)[:, None]
    mid, side = a * np.sqrt(1 + same), b * np.sqrt(1 - same)
    decay = gain_of(-60 * when / read(GARAGE_DECAY, hz)[:, None])
    diffuse = np.array([mid + side, mid - side]) * decay
    tail = signal.istft(diffuse, SR, nperseg=256)[1][:, :size] * np.clip((t - .002) / build_s, 0, 1)
    paths = gain_of(wet_db) * np.sqrt(2) * unit(tail)
    add(paths[0], 0, np.ones(1))
    add(paths[1], rng.uniform(.00009, .00012), np.ones(1))
    distance = rng.uniform(.7, 1.3)  # stretches every reflection's delay
    for left, right, gain in ECHOES:
        add(paths[0], left * distance, np.array([gain]))
        add(paths[1], right * distance, np.array([gain]))
    return signal.fftconvolve(x[None], paths, axes=1)


def moving(x, wet_db, build_s=0.00045, size=4096):
    """Hands and sheet keep moving, so each stretch of sound finds its own paths through the room."""
    out, hop = np.zeros((2, N + size)), size // 2
    padded, window = np.pad(x, (hop, size)), signal.get_window("hann", size)
    for start in range(0, N + hop, hop):
        stretch = padded[start:start + size] * window
        for channel, heard in zip(out, garage(stretch, wet_db, build_s)):
            add(channel, start / SR, heard)
    return out[:, hop:hop + N]


def scene():
    """Knife work, handling and faint room air, each group with its own share of garage."""
    rubbing = moving(cutting() + handling() + room_air() + rubs() + scraping(), wet_db=3.5)
    struck = blows() + thuds() + dragging() + snagging() + groaning()
    knocking = moving(struck, wet_db=-2.5, build_s=0.0062, size=16384)
    crisp = garage(ticks(), wet_db=0.0)[:, :N]
    loose = garage(strips(), wet_db=-6.5)[:, :N]
    return rubbing + knocking + crisp + loose


def microphone_pair(left, right, hz):
    """In the top treble the two channels swing in and out of step as the frequency rises."""
    angle = np.pi * (hz - PAIR_IN_STEP_HZ) / PAIR_PERIOD_HZ
    share = np.clip((hz - PAIR_FROM_HZ) / (PAIR_FULL_HZ - PAIR_FROM_HZ), 0, 1)
    mid = (left + right) / 2 * (1 - share + share * np.sqrt(2) * abs(np.cos(angle)))
    side = (left - right) / 2 * (1 - share + share * np.sqrt(2) * abs(np.sin(angle)))
    return np.array([mid + side, mid - side])


def record(dry):
    """The microphone pair sheds the deepest bass, and the left is a little brighter; then the band limit."""
    hz = np.fft.rfftfreq(N, 1 / SR)
    lean_db = read(LEFT_LEAN, hz)
    left, right = rfft(dry) * gain_of(np.array([lean_db, -lean_db]) / 2)
    heard = irfft(microphone_pair(left, right, hz), N)
    heard = signal.sosfilt(signal.butter(2, 38, "highpass", fs=SR, output="sos"), heard)
    band_limit = signal.firwin(511, BAND_LIMIT_HZ, window=("kaiser", 9), fs=SR)
    return signal.oaconvolve(heard, band_limit[None], "same")


dry = scene()
out = record(dry)
generate_wav(out)
```